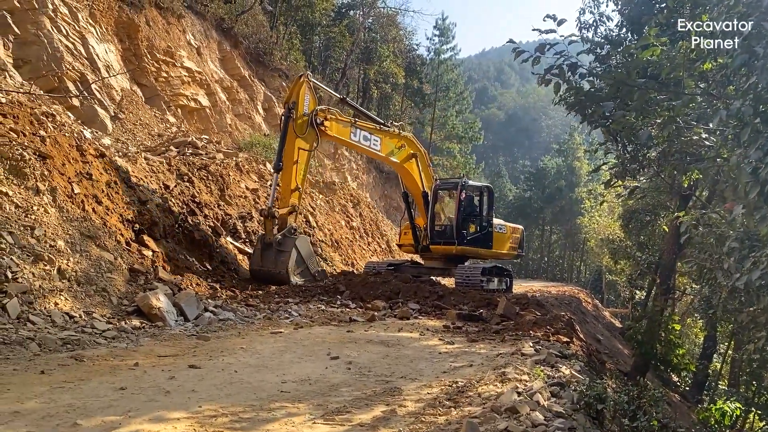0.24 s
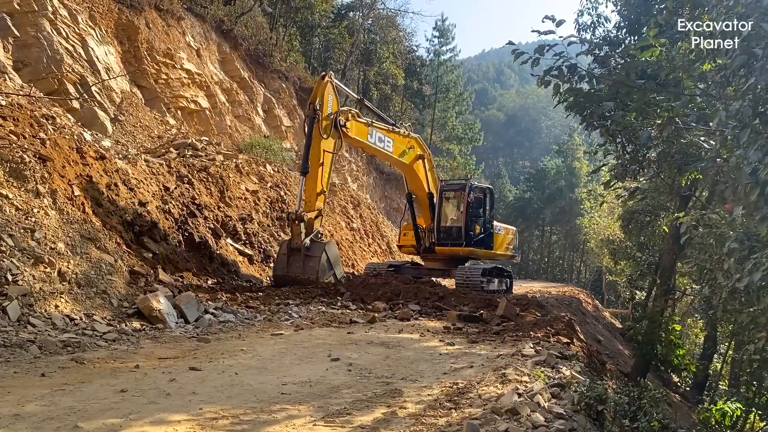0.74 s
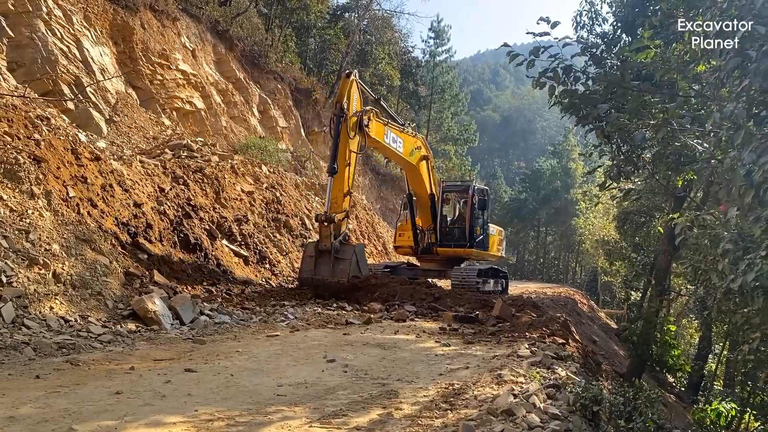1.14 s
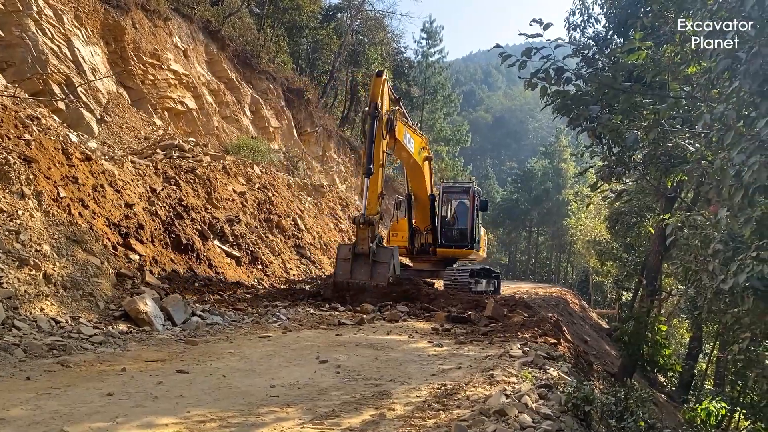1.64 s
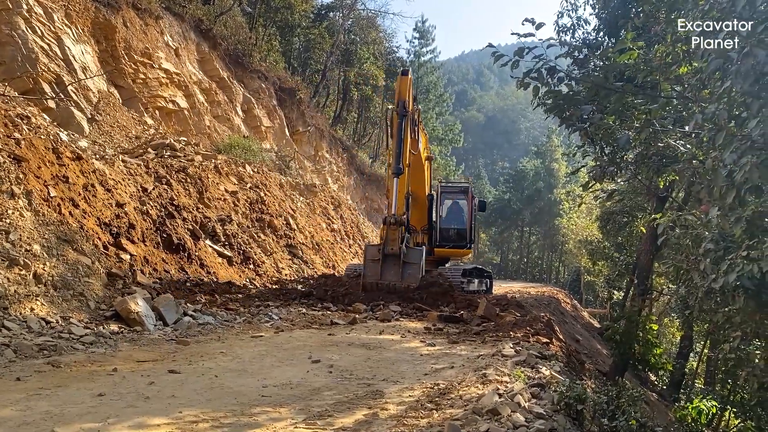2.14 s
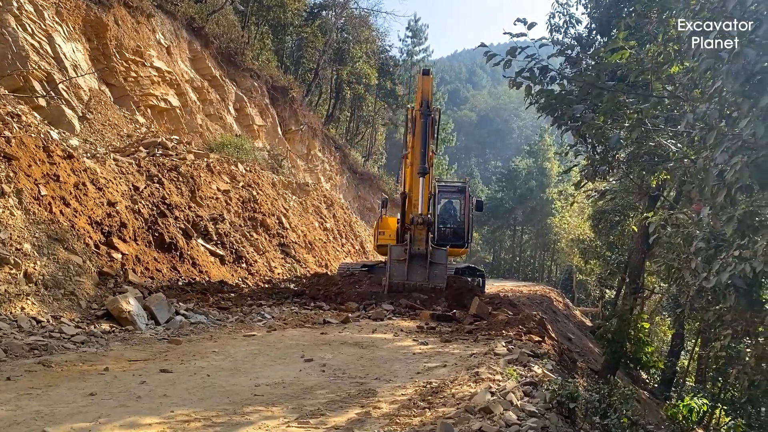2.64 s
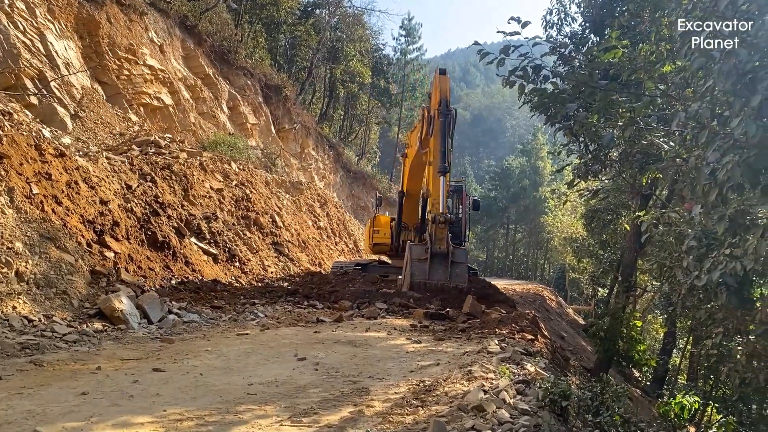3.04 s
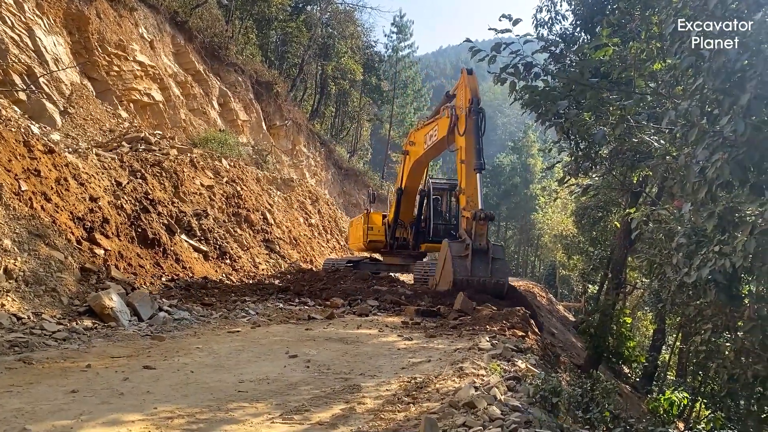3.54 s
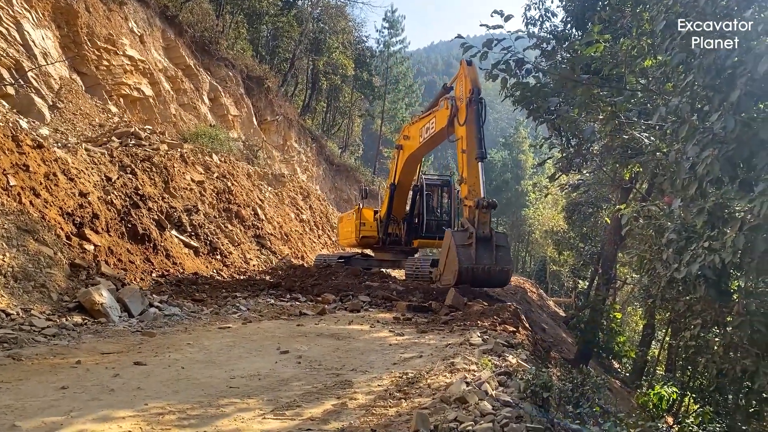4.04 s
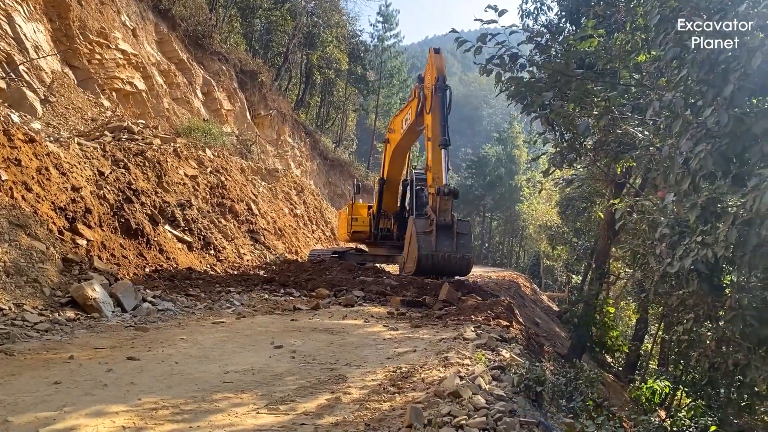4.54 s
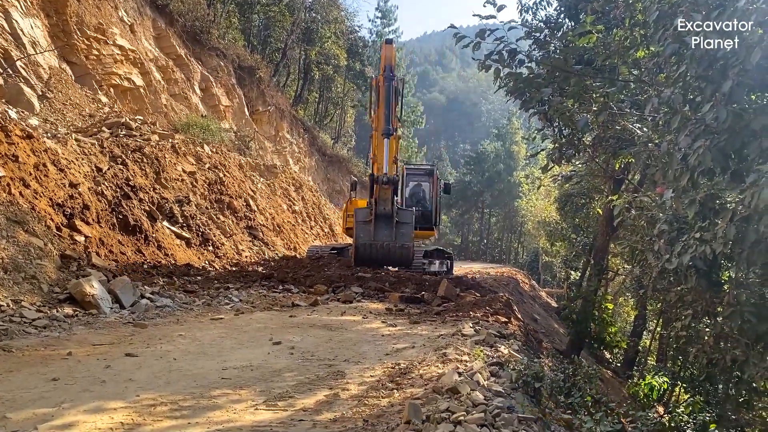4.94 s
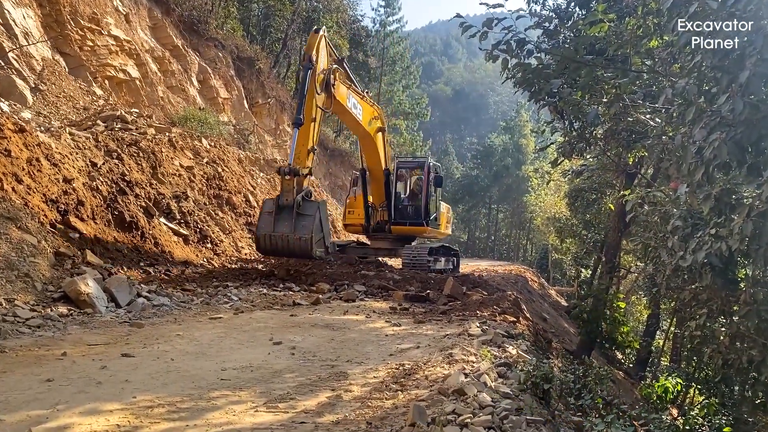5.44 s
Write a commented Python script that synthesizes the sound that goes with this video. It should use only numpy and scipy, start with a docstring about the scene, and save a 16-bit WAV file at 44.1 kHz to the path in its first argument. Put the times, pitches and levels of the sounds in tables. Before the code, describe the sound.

A digger's engine rumbles and whirs while rock scrapes, knocks and bangs on its heavy steel bucket.

```python
"""Excavator bucket in rock

A diesel rumbles and clatters in noise puffed at each firing, under wavering fan and hydraulic pump tones.
Clumped grit drags along the steel bucket; stones slide off it and strike it as filtered bursts with
ringing modes, and three loose steel parts clink as dying sines. Low noise comes through the ground.
A rock face scatters the steel's sound back, and two microphone ports hear it all a little differently."""
import sys
import numpy as np
from scipy import signal
from scipy.fft import rfft, irfft
from scipy.io import wavfile
from scipy.ndimage import uniform_filter1d

SR = 44100
rng = np.random.default_rng(int(sys.argv[2]) if len(sys.argv) > 2 else 0)


def bounce(signal):
    """Save signal as a 16-bit WAV file at the path given by the first command-line argument."""
    frames = np.transpose(np.atleast_2d(signal))
    limited = np.clip(frames, -1, 1)
    pcm = np.round(limited * 32767).astype(np.int16)
    wavfile.write(sys.argv[1], SR, pcm)


N = 250929
TIME = np.arange(N) / SR
HZ = np.fft.rfftfreq(N, 1 / SR)
GRID = np.fft.rfftfreq(4096, 1 / SR)  # coarse frequency grid for the causal filters
OCTAVES = np.log2(np.maximum(GRID, 1000) / 2000)  # tilt axis about 2 kHz, flat below 1 kHz


def amp(db):
    """Decibels to an amplitude factor."""
    return 10 ** (np.asarray(db) / 20)


def evened(x):
    """Scale to an rms of 1."""
    return x / np.sqrt(np.mean(x ** 2) + 1e-20)


def read(points, hz, column=1):
    """Read one column of a frequency table, straight between points on a log frequency axis."""
    table = np.transpose(points)
    return np.interp(np.log(hz + 1), np.log(table[0] + 1), table[column])


def curves(rows):
    """Turn a table of moments into one smooth-running envelope per column."""
    s, *columns = np.transpose(rows)
    return [np.interp(TIME, s, c) for c in columns]


def coloured(x, gain_db):
    """Causal filter: the phase follows from the log gain given on an even grid up to half the rate."""
    mirrored_db = np.concatenate([gain_db, gain_db[-2:0:-1]])
    log_gain = np.log(amp(np.maximum(mirrored_db, -100)))
    spectrum = np.exp(np.conj(signal.hilbert(log_gain)))
    taps = np.fft.ifft(spectrum).real[:2048]
    return signal.oaconvolve(x, taps)[:len(x)]


def drift(rate_hz):
    """Slow random wander of rms 1, straight between points drawn at rate_hz."""
    return evened(np.interp(TIME * rate_hz, np.arange(4000), rng.standard_normal(4000)))


def tone(hz, waver):
    """A sine whose pitch and level wander."""
    turns = np.cumsum(hz * (1 + waver * drift(rate_hz=12))) / SR
    return np.sqrt(2) * np.sin(2 * np.pi * turns) * amp(3.0 * drift(rate_hz=14))


def grit(count, per_s, spread_db, hiss):
    """Sparse clicks of uneven size over a little noise, evened to rms 1."""
    size = amp(spread_db * np.minimum(rng.exponential(1, count), 5)) * rng.choice([-1., 1.], count)
    clicks = evened(size * (rng.random(count) < per_s / SR))
    return evened(clicks + hiss * rng.standard_normal(count))


# the running engine: t/s, rumble level/dB, clatter level/dB
ENGINE_LEVELS = [(0, -24, -33.5), (.5, -28, -34), (1.2, -30, -32.5), (1.8, -29.5, -37), (2.6, -32.5, -36),
                 (3.3, -34, -33.5), (4.2, -25.5, -34.5), (4.7, -32.5, -36), (5.2, -27, -38.5),
                 (5.69, -35, -30)]
# colour of the running gear's noise: f/Hz, level/dB
ROAR_COLOUR = [(25, 3), (55, -17), (95, 5.5), (120, 11), (170, 13), (230, 9), (330, -28), (480, -17),
               (800, -25.5), (1100, -20), (1600, -24), (2200, -24.5), (3300, -29.5), (4500, -30.5),
               (5300, -37.5), (7500, -38.5), (11000, -51), (15000, -90)]
# covers and pipes that the clatter rings: f/Hz, width/Hz, level/dB before a common 29 dB trim
HOUSING_MODES = [(1077, 13, 15.5), (714, 54, 4.5), (2230, 114, 6), (3050, 130, -18)]
# exhaust orders: multiple of the firing rate, level/dB
EXHAUST_ORDERS = [(1, -42), (1.5, -45.5), (2, -35.5), (2.5, -47.5), (3, -44.5), (3.5, -43.5), (4.5, -50),
                  (6.5, -49.5)]
# the pump's hum: t/s, level/dB
PUMP_HUM = [(0, -43), (.65, -48), (.82, -37.5), (1.08, -36), (1.2, -48.5), (1.8, -44.5), (3, -40.5),
            (4.7, -52), (5.2, -43), (5.69, -42)]
# overtones of the hum: multiple of the hum's pitch, level/dB against the hum
PUMP_OVERTONES = [(2, -23), (4, -13)]
FIRING_HZ, HUM_HZ = 61.74, 549
FAN_HZ, FAN_DB = 285.3, -44.5


def machine():
    """Noise puffed at each firing, exhaust orders, fan blades and pump ripple."""
    rumble_db, clatter_db = curves(ENGINE_LEVELS)
    hum_db, = curves(PUMP_HUM)
    turns = np.cumsum(FIRING_HZ * (1 + 0.031 * drift(rate_hz=17))) / SR
    puffs = 1 + .5 * np.exp(-(turns % 1) / 0.018)
    unsteady = amp(1.25 * drift(rate_hz=15))
    rough = puffs * unsteady * grit(N, per_s=990, spread_db=0.5, hiss=2.37)
    noise = rfft(rough) * amp(read(ROAR_COLOUR, HZ))
    low = 1 / (1 + (HZ / 420) ** 4)  # exhaust and frame below, valve gear and hydraulics above
    housing = 1 + sum(amp(db - read(ROAR_COLOUR, hz) - 29.0) / (1 + (2 * (HZ - hz) / width) ** 2)
                      for hz, width, db in HOUSING_MODES)
    out = amp(rumble_db) * evened(irfft(noise * low, N))
    out += amp(clatter_db) * evened(irfft(noise * (1 - low) * housing, N))
    out += sum(amp(db) * tone(k * FIRING_HZ, waver=0.0042) for k, db in EXHAUST_ORDERS)
    out += amp(FAN_DB) * tone(FAN_HZ, waver=0.0148)
    out += amp(hum_db) * tone(HUM_HZ, waver=0.00904)
    return out + sum(amp(hum_db + db) * tone(k * HUM_HZ, waver=0.004) for k, db in PUMP_OVERTONES)


# the deepest rumble, stronger while the bucket digs and tips: t/s, level/dB
GROUND_RUMBLE = [(0, -51), (2.1, -52), (2.22, -48), (2.4, -59), (3.5, -59), (3.79, -40), (3.87, -48),
                 (3.96, -24), (4.1, -42), (4.35, -38), (4.5, -52), (5.45, -36), (5.69, -24)]


def deep():
    """Noise humped around 55 Hz, carried by the ground."""
    level_db, = curves(GROUND_RUMBLE)
    noise = rfft(rng.standard_normal(N)) * amp(-12 * np.log2((HZ + 1) / 55) ** 2)
    return amp(level_db) * evened(irfft(noise, N))


# colour of rock on steel: f/Hz, level/dB
ROCK_ON_STEEL = [(330, -21), (480, 5), (800, 4), (1100, -1.5), (1600, -1.5), (2200, 2.5), (3800, -4),
                 (5500, -10.5), (7500, -12.5), (11000, -21), (15000, -38)]
# plates of the bucket: f/Hz, width/Hz, level/dB
BUCKET_PLATES = [(1060, 45, -3), (1170, 150, -1), (1310, 40, -6), (2060, 70, -3), (2220, 60, -3),
                 (2860, 150, -6), (3470, 30, -9), (3655, 45, -8), (4000, 90, -8), (4520, 50, -13),
                 (5200, 110, -14), (5805, 40, -15), (6430, 75, -14), (6670, 55, -14), (6920, 110, -16)]


def ring(weights_db, share_db):
    """Gain in dB of the bucket's plates: the crack passes, and each mode adds a peak."""
    hz, width, db = np.transpose(BUCKET_PLATES)[:, :, None]
    height = amp(2 * (db + weights_db[:, None] - read(ROCK_ON_STEEL, hz) + share_db))
    peaks = height / (1 + (2 * (GRID - hz) / width) ** 2)
    return 10 * np.log10(1 + peaks.sum(0))


# soil and stones dragging on the steel: t/s, grinding level/dB, thudding level/dB
DRAG_LEVELS = [(0, -33.5, -23), (.14, -29.5, -23.5), (.33, -38, -28), (1.1, -42, -28), (1.8, -38, -31),
               (2.12, -31.5, -25), (2.23, -21, -21.5), (2.38, -29.5, -28.5), (2.65, -40.5, -28),
               (3.05, -33, -27), (3.17, -27, -20.5), (3.47, -43.5, -27.5), (3.77, -18, -19.5),
               (3.91, -36, -29), (4, -22, -23), (4.13, -26, -25), (4.26, -32.5, -23.5),
               (4.38, -39.5, -27.5), (4.75, -59, -28), (5.05, -42.5, -29), (5.4, -37.5, -30),
               (5.52, -21, -22.5), (5.69, -51, -31)]
# low thud of the ground and the boom, for drags and blows alike: f/Hz, level/dB
THUD_COLOUR = [(25, -21.5), (50, -3.5), (85, 2.5), (130, 4.5), (280, 1), (340, -2), (480, -12.5),
               (800, -39)]
DRAG_DB = 25  # grinding level in dB where dull and sharp would blend evenly
DULL_TILT, SHARP_TILT = -4, 0.91  # dB an octave


def scrape():
    """Clumped slips of grit excite the steel; harder grinding blends from a dull to a bright colour."""
    grind_db, thud_db = curves(DRAG_LEVELS)
    clumps = amp(2.0 * drift(rate_hz=120) + 1.1 * drift(rate_hz=15))
    slips = grit(N, per_s=900, spread_db=0.5, hiss=1.0) * clumps
    colour = read(ROCK_ON_STEEL, GRID) + ring(np.zeros(len(BUCKET_PLATES)), share_db=0.0)
    dull = evened(coloured(slips, colour + DULL_TILT * OCTAVES))
    sharp = evened(coloured(slips, colour + SHARP_TILT * OCTAVES))
    share = 1 / (1 + amp(0.5 * (DRAG_DB - grind_db)))
    lumps = rng.standard_normal(N) * amp(1.2 * drift(rate_hz=30))
    thuds = evened(coloured(lumps, read(THUD_COLOUR, GRID)))
    return amp(grind_db) * ((1 - share) * dull + share * sharp) + amp(thud_db) * thuds


# stones sliding off the steel, with a soft start: t/s, level/dB, stone's pitch f/Hz,
# brightness/(dB an octave), thud level/dB against the crack, stone's ring level/dB, rise/s
STONE_SLIDES = [(.022, -20, 3230, -11, -15, 6, 0.007), (.038, -15, 2800, -4.5, -3, 10, 0.011),
                (.086, -13, 2360, -6, -3, 10, 0.0069), (.116, -17, 1500, -1, 2, -5, 0.01),
                (.155, -14, 2900, -2.5, 0, 3, .016), (.25, -24, 3000, -2.5, -8, -2, .012),
                (.994, -18.5, 1090, -2, 1, 10, 0.0074), (1.808, -22, 1110, -1, 1, 2, .01),
                (1.885, -20, 1140, -1, 3, 7, 0.012), (2.042, -16, 1070, -4, -18, -2, .012),
                (3.003, -25, 1010, 4, -14, 18, 0.0081), (3.131, -11.5, 1370, 2, -8, 8, 0.0081),
                (3.32, -17.5, 990, 1.5, -9, 6, .01), (3.939, -27, 1060, -3, -8, 8, 0.013),
                (4.07, -10, 1630, -10, -14, 20, 0.0088), (4.122, -16, 1090, -2.5, -1, 3, 0.011),
                (4.178, -13, 1210, -4, 4.5, 2, 0.01), (4.239, -9, 1430, -4.5, -6, 14, 0.011),
                (4.261, -22, 4100, -7, -18, 22, 0.0065), (5.376, -21, 2320, -1.5, -7, 13, 0.017)]
# stones striking the bucket: t/s, level/dB, stone's pitch f/Hz,
# brightness/(dB an octave), thud level/dB against the crack, stone's ring level/dB
STONE_BLOWS = [(0.7869, -17.5, 1150, -4, -10, -12), (1.198, -13.5, 1070, -5, -2, -11),
               (1.2352, -18.5, 1030, -2, -9, -8), (1.951, -4.5, 1985, -2.5, -11, 10.5),
               (1.954, -8, 2610, -0.5, -8, 8.5), (1.966, -8, 1110, -2, -2, 7),
               (2.0259, -17.5, 2275, -2.5, -19, 6), (2.138, -10, 1930, -6.5, -5, 8),
               (2.14, -23, 4150, -5, -20, 14), (2.154, -11, 2130, -1, 1.5, 1),
               (2.161, -26, 5850, 7, -12, 7), (2.185, -7, 1100, -1, -3, -10), (2.199, 2, 2020, 2, -11, 10),
               (2.206, -3.5, 3860, 2, -30, 6), (2.21, -5, 6630, 3.5, -20, 4),
               (2.218, -3.5, 2740, -0.5, -2, 6), (2.225, -9, 3950, 1, 2.5, 15),
               (2.244, -24, 1500, 9, -13, 7), (2.252, -6.5, 2160, -1, -5, 0),
               (2.264, -10, 2630, -5, -21, 14), (2.273, -12.5, 3000, 4.5, -11, 10),
               (2.291, -21, 6540, -2, -18, 10), (2.304, -13.5, 3940, 5.5, -16, 17),
               (2.409, -14.5, 2330, 0, 1, 3), (2.532, -8, 2150, -1, -6.5, 9),
               (2.538, -11.5, 1780, -2, -2, 11), (2.7074, -20.5, 1190, -4, 4, 13),
               (2.722, -24, 3500, 0, -15, 9), (2.7764, -12.5, 6620, 3, -3.5, -1),
               (2.788, -18.5, 3980, 2, 6, 6), (2.8443, -9, 2185, -3, -4, 7),
               (2.849, -14.5, 1240, -2, -3, 14), (2.974, -22.5, 2220, 2.5, -12, 7),
               (3.074, -16.5, 2240, -3, -19, 3), (3.0924, -4.5, 2690, -1, -1, 3.5),
               (3.15, -9, 2310, -3, -6, -1), (3.1694, -19, 2640, 2, -15, 14), (3.261, -20, 2220, 0, -22, 8),
               (3.3943, -19.5, 2130, -1, -24, 6), (3.53, -22, 1100, -2, 9, 11),
               (3.586, -13, 2140, -8, -17, 9), (3.59, -12.5, 2880, -1, -2, 11),
               (3.601, -14.5, 2900, -5, -8, 11), (3.6315, -14, 1990, -4, -6, 12),
               (3.6682, -11, 1580, 1, -5, 14), (3.681, -13, 1190, -3, -12, 25),
               (3.704, -17.5, 3000, -4, -5, 16), (3.7133, -9.5, 2100, -3.5, -5, 9),
               (3.7246, -6.5, 6100, -0.5, -13, 0), (3.7524, -6, 1394, 4.5, -22, 13),
               (3.759, -2, 1182, -0.5, -4.5, 10), (3.764, -5, 1900, -7, -5, 14),
               (3.77, -5, 1190, -2, -3, 14), (3.788, -12, 1140, 0, -10, 15), (3.801, -8, 1150, 0.5, -8, 7),
               (3.829, -16, 1120, -3, -2, 18), (3.849, -14, 1120, -12, -9, 11),
               (3.97, -9.5, 1040, 0, -14, 4), (3.9812, 1.5, 2486, 6, -7.5, 6),
               (4.009, -17, 1350, -4, -11, 14), (4.059, -2.5, 1796, -0.5, -8.5, 11.5),
               (4.063, -11, 3100, -1.5, -10, 4), (4.087, -18, 1880, -16, -15, 22),
               (4.147, -14.5, 1190, -6.5, -16, -8), (4.173, -17, 2950, -6, 0, 5),
               (4.2303, -11, 1410, -6, -9, 11), (4.258, -12.5, 1840, -5, -20, 17),
               (4.268, -16, 1590, -6, -14, 23), (4.27, -17, 910, -1.5, 3, 7), (4.279, -18, 1170, 2, -5, 15),
               (4.302, -17, 1300, -7, -14, 6), (4.323, -20.5, 1170, -10, -8, 6),
               (4.4728, -24, 1270, 0, -6, 5), (5.3066, -17, 563, -3.5, -18, 1),
               (5.4668, -16, 2820, -11, 1, 19), (5.486, -27, 5800, -11, -4, 14),
               (5.49, -10.5, 1070, 0, -15, 9.5), (5.504, -17.5, 6600, -1, -12, 7),
               (5.517, -11, 1054, -1, -2, 13), (5.525, -12, 3020, 5, -7, 12),
               (5.537, -11.5, 2900, -11, -14, 2), (5.562, -21, 1100, -13, -1, 1),
               (5.6133, -19.5, 1910, -17, -10, 7)]
# ringing of a struck stone: multiple of its pitch, level/dB
KNOCK_MODES = [(.53, -9.5), (.78, -11.5), (1, -1.5), (1.29, -10), (1.52, -14), (1.9, -13)]
RISE_S, SOFT_RISE = .0007, .22  # rise of a 0 dB blow in s; dB longer for each dB weaker
TICK = 2.6  # a blow's first contact, against the grit's rms
CRACK_T60, SHOWER_T60, SHOWER_SHARE = 0.06, 0.17, 0.42  # a hit dies fast (s), its chips slowly (s)
SHOWER_TILT = -1.4  # the shower of chips is duller, dB an octave
RING_HALF_WIDTH_HZ = 110  # of the stone's and the lip's ring
LIP_HZ, LIP_RING_DB = 2790, -1.5  # the bucket's lip rings at its own pitch
CREST = 2.3  # nominal peak over the loudest 3 ms rms
KNOCK_DB, KNOCK_T60 = -14, .026  # a blow sets the stone ringing cleanly: dB against its ring level, s


def stones():
    """Each blow or slide is a crack and a dying, duller shower of chips, ringing stone and some plates."""
    out, t = np.zeros(N + 9000), np.arange(9000) / SR
    hits = [(*row, RISE_S * amp(-SOFT_RISE * row[1]), TICK) for row in STONE_BLOWS]
    hits += [(*row, 0) for row in STONE_SLIDES]
    luck = rng.standard_normal((len(hits), len(BUCKET_PLATES)))  # dB each plate answers by, hit by hit
    for hit, weights in zip(hits, luck):
        s, level_db, stone_hz, bright, thud_db, ring_db, rise_s, tick = hit
        rise, after = np.minimum(t / rise_s, 1), np.maximum(t - rise_s, 0)
        first = grit(len(t), per_s=2000, spread_db=1.0, hiss=0.91) * rise * amp(-60 * after / CRACK_T60)
        first[8] += tick
        chips = grit(len(t), per_s=500, spread_db=3.0, hiss=0.87) * rise
        chips = chips * amp(-60 * after / SHOWER_T60) * SHOWER_SHARE

        pitches = ((stone_hz, ring_db), (LIP_HZ, LIP_RING_DB))
        peaks = sum(amp(2 * db) / (1 + ((GRID - hz) / RING_HALF_WIDTH_HZ) ** 2) for hz, db in pitches)
        colour = read(ROCK_ON_STEEL, GRID) + ring(1.0 * weights, share_db=8.5)
        colour = colour + 10 * np.log10(1 + peaks) + bright * OCTAVES
        crack = coloured(first, colour) + coloured(chips, colour + SHOWER_TILT * OCTAVES)
        crack = crack / (CREST * np.sqrt(uniform_filter1d(crack ** 2, size=130).max()))
        thud = coloured(first + chips, read(THUD_COLOUR, GRID))

        modes = sum(amp(db) * np.sin(2 * np.pi * (k * stone_hz * t + rng.random()))
                    for k, db in KNOCK_MODES)
        knock = min(amp(ring_db + KNOCK_DB), 1) * modes * amp(-60 * t / KNOCK_T60)
        knock = knock * (tick > 0)  # slides have no knock
        sound = (crack + knock) / np.hypot(1, abs(knock).max())
        sound = sound + amp(thud_db) * thud / abs(thud).max()
        out[round(s * SR):][:len(t)] += amp(level_db) * sound
    return out[:N]


# three loose steel parts, each clinking once: t/s, level/dB, modes as (f/Hz, level/dB, t60/s)
STEEL_CLINKS = [(1.198, -31.5, [(6400, -1.5, 0.032)]), (4.913, -23, [(1280, -0.5, 0.042), (2520, -2, 0.084),
                (3055, -7, 0.093), (3840, -12, 0.084), (4770, -13.5, 0.14), (4500, -12, 0.051)]),
                (5.661, -24, [(3300, 2, 0.03), (3520, 4, 0.029), (3880, 5.5, 0.022), (6300, -17, .02)])]


def clinks():
    """Loose steel rings as dying sines with a soft start."""
    out, t = np.zeros(N + 9000), np.arange(9000) / SR
    for s, level_db, modes in STEEL_CLINKS:
        sound = sum(amp(db - 60 * t / t60) * np.sin(2 * np.pi * (hz * t + rng.random()))
                    for hz, db, t60 in modes)
        out[round(s * SR):][:len(t)] += amp(level_db) * sound * np.minimum(t / 0.0021, 1)
    return out[:N]


def scattered(x, t60):
    """Sparse taps of random sign, dying away: the rock face and the trees."""
    taps = np.zeros(SR // 2)
    at = np.arange(40, len(taps) - 20, 20)
    at = at + rng.integers(0, 20, len(at))
    taps[at] = rng.choice([-1., 1.], len(at)) * amp(-60 * at / SR / t60)
    return signal.oaconvolve(x, taps / np.linalg.norm(taps))[:N]


def diffuse(x):
    """The same sound with ever-changing phases: what reaches a port by many small paths."""
    z = signal.stft(x, nperseg=128, noverlap=96)[2]
    turned = z * np.exp(2j * np.pi * rng.random(z.shape[::-1]).T)
    return np.std(x) * evened(signal.istft(turned, nperseg=128, noverlap=96)[1][:N])


# microphone ports: f/Hz, left's lead/rad (before the treble lag), left minus right level/dB, likeness/0-1
PORT_PAIR = [(60, -0.19, 0.2, 0.99), (250, -0.28, 0.8, 0.99), (400, 0, -1, 0.99), (650, 0.32, -4.0, 0.93),
             (900, 0.93, -0.2, 0.88), (1200, .35, 1.5, .88), (1700, 0.28, 4, 0.75), (2000, -0.1, -0.3, 0.9),
             (2450, 2.26, 3, 0.6), (2800, -0.1, 2.5, 0.84), (4000, 0.1, 1, 0.85), (5600, -.1, 2.5, 0.45),
             (6600, 0.28, 1.7, 0.9), (8800, 0, 0, 0.9)]
LAG_FROM_HZ, HALF_TURN_HZ = 6800, 2250  # above the first, left lags half a turn more for each of the second
STEP = .4  # rad, bends that lag into soft steps of half a turn


def scene():
    """The right port hears the left one's sound turned in phase, plus a diffuse part of its own."""
    engine_and_ground = machine() + deep()
    steel = scrape() + stones() + clinks()
    left = engine_and_ground + steel + amp(-10.5) * scattered(steel, t60=0.17)
    lead, balance_db, same = (read(PORT_PAIR, HZ, column=k) for k in (1, 2, 3))
    lag = np.pi * np.maximum(HZ - LAG_FROM_HZ, 0) / HALF_TURN_HZ
    lead = lead - lag + STEP * np.sin(2 * lag)
    shared = same * np.exp(-1j * lead) * rfft(left)
    right = shared + .9 * np.sqrt(1 - same ** 2) * rfft(diffuse(left))
    return irfft(np.array([rfft(left) * amp(balance_db / 2), right * amp(-balance_db / 2)]), N)


# the microphone's fading top: f/Hz, level/dB
FADING_TOP = [(9000, -3.5), (13000, -6.5), (14500, -13), (15800, -20)]
EDGE_HZ = 15800


def record(dry):
    """The microphone's bass cut and fading top, a soft overload, then the band limit."""
    cut = signal.sosfilt(signal.butter(3, 45, "high", fs=SR, output="sos"), dry)
    cut = irfft(rfft(cut) * amp(read(FADING_TOP, HZ)), N)
    soft = cut / (1 + (cut / .95) ** 6) ** (1 / 6)
    band_limit = signal.firwin(511, EDGE_HZ, window=("kaiser", 9), fs=SR)
    return signal.oaconvolve(soft, band_limit[None], "same")


dry = scene()
out = record(dry)
bounce(out)
```